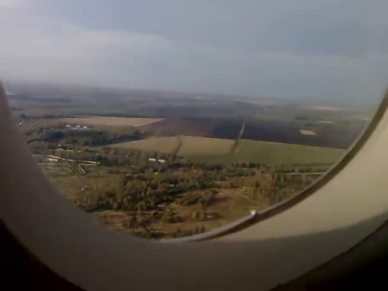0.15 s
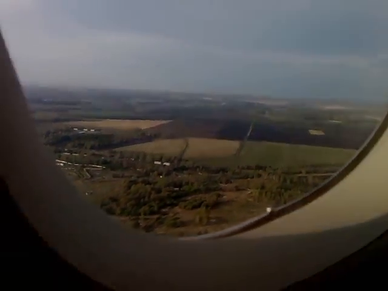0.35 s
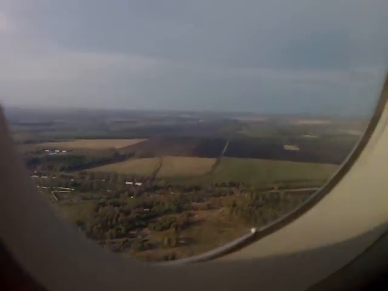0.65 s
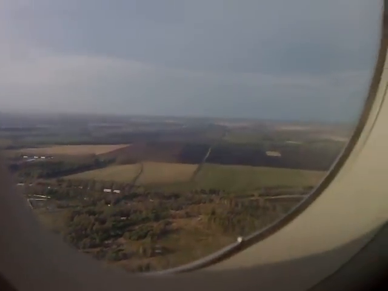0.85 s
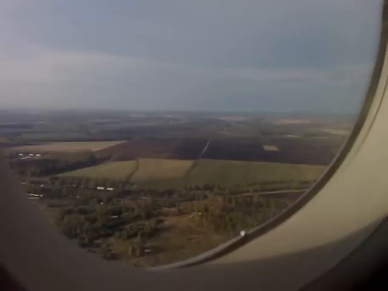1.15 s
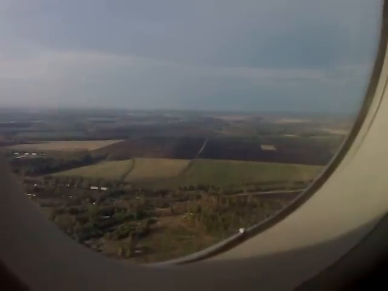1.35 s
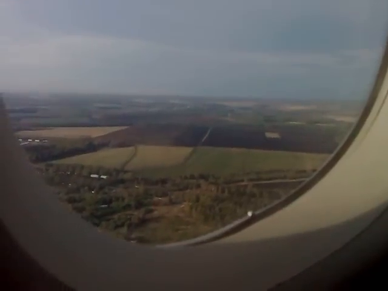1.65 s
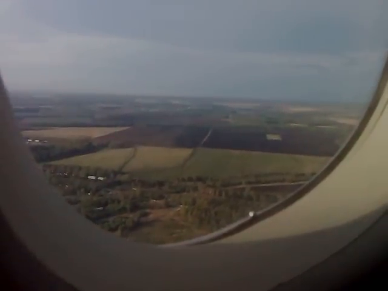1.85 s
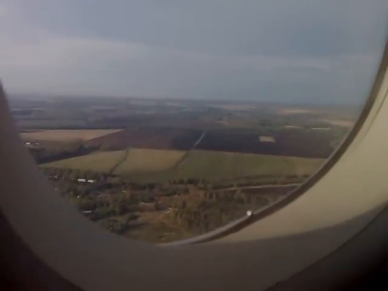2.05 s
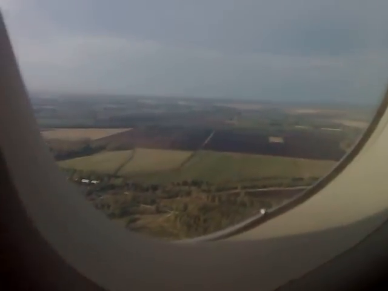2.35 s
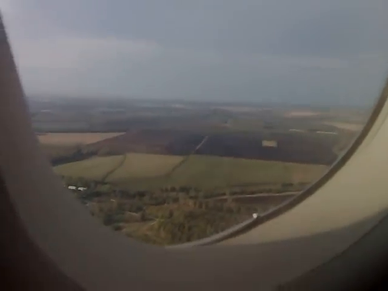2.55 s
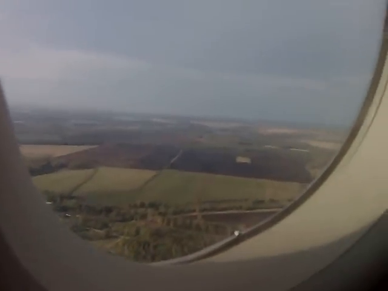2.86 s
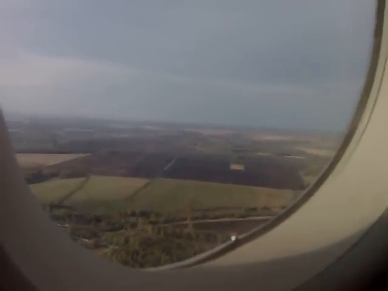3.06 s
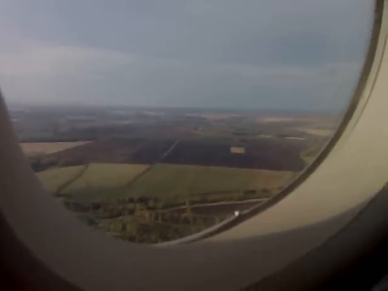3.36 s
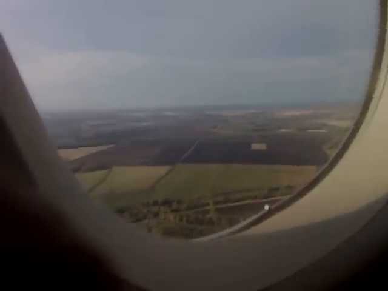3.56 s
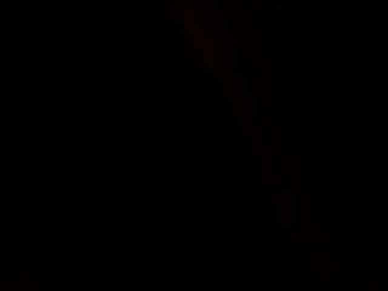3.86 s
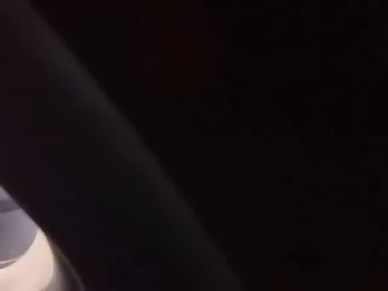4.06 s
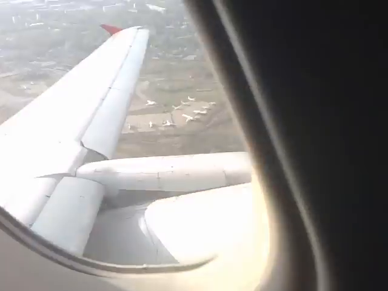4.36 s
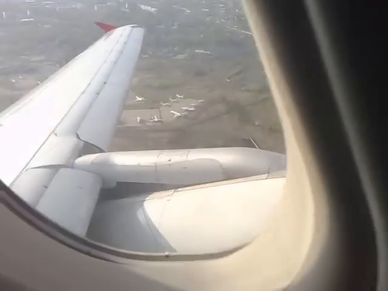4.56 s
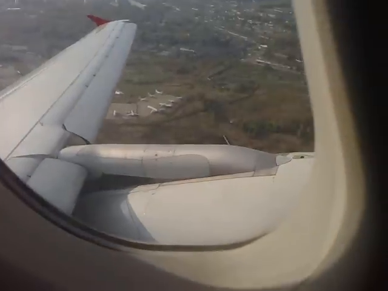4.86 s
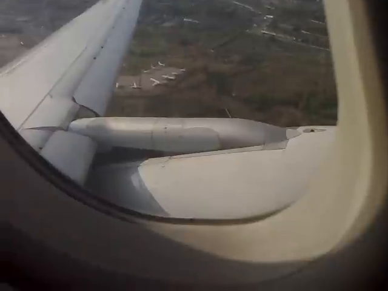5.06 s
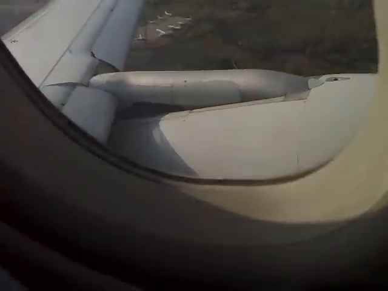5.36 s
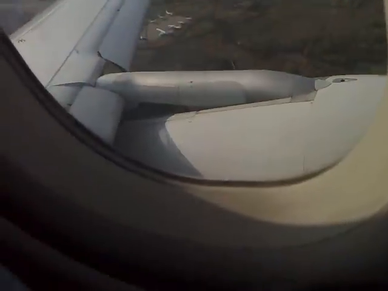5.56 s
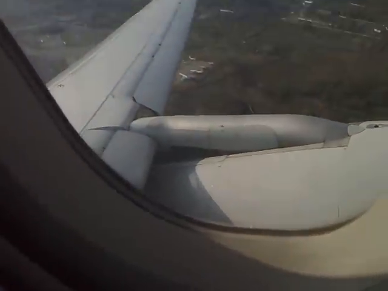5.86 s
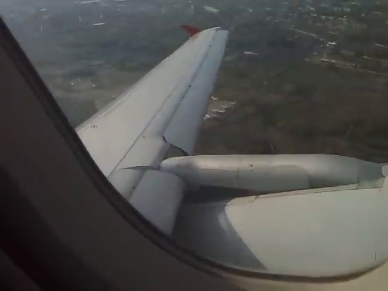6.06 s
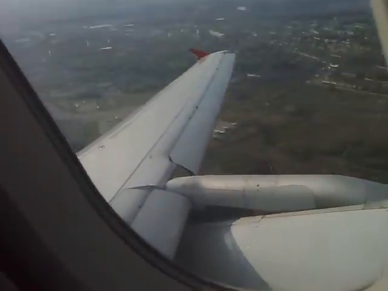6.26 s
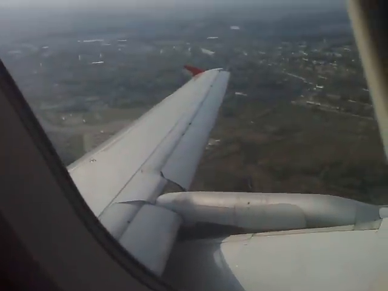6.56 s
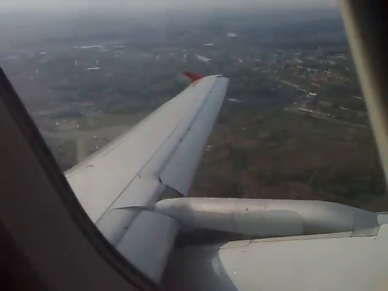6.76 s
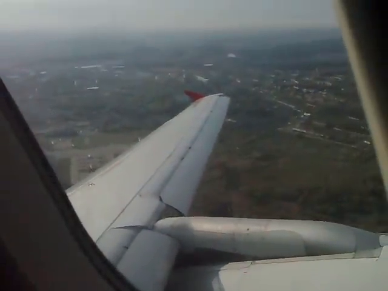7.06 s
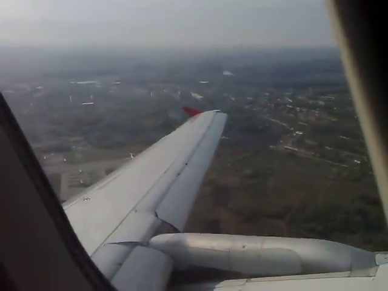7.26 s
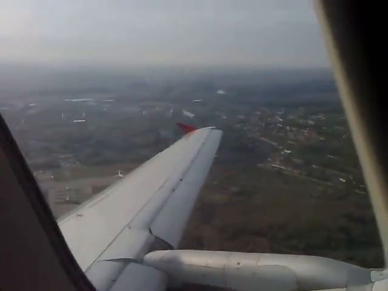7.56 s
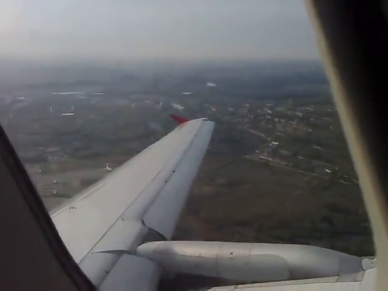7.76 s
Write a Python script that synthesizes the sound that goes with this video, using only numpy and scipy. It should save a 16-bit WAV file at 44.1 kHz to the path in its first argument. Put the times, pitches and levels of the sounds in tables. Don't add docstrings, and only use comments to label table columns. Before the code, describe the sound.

Inside an airliner cabin during climb, a loud steady engine rumble and low hum carry a buzzing, sawing fan whine and soft air hiss.

```python
import sys
import numpy as np
from scipy import signal
from scipy.io import wavfile
from scipy.ndimage import uniform_filter1d

SR = 44100
rng = np.random.default_rng(int(sys.argv[2]) if len(sys.argv) > 2 else 0)


def volts_from_decibels(level):
    exponent = np.asarray(level, float) / 20
    return 10 ** exponent


def bounce(signal):
    frames = np.transpose(np.atleast_2d(signal))
    limited = np.clip(frames, -1, 1)
    pcm = np.round(limited * 32767).astype(np.int16)
    wavfile.write(sys.argv[1], SR, pcm)


N = 349272


def evened(x):
    return x / np.sqrt(np.mean(x ** 2) + 1e-20)


def wander(t, top_hz, count):
    hz = np.geomspace(top_hz / 12, top_hz, num=12)[:, None]
    phase = rng.random((count, 12, 1))
    waves = np.sin(2 * np.pi * (hz * t + phase)) / np.sqrt(hz)
    return evened(waves.sum(axis=1))


# time in seconds, place from 0 (forward window)
# to 1 (wing window), change of the treble in dB as hand and wall shade it.
CAMERA = [(0, 0, 0), (1.4, 0, -.5), (2.1, 0, 1), (2.55, 0, -.5), (2.75, 0, -4.5), (3.3, 0, -5),
          (3.9, .1, -4.5), (4.3, .45, -2.5), (4.7, 1, 0), (5.6, 1, -.5), (6.5, 1, 1), (7.92, 1, .5)]


def camera(t):
    s, place, shade_db = np.transpose(CAMERA)
    return np.clip(np.interp(t, s, place), 0, 1), np.interp(t, s, shade_db)


def heard_db(table, hz, t):
    table_hz, forward_db, wing_db = np.transpose(table)
    place, shade_db = camera(t)
    pitch, table_pitch = np.log(hz + 1), np.log(table_hz)
    forward = np.interp(pitch, table_pitch, forward_db)[:, None]
    wing = np.interp(pitch, table_pitch, wing_db)[:, None]
    treble = np.clip(np.log((hz[:, None] + 1) / 3800) / .45, 0, 1)
    return forward + (wing - forward) * place + treble * shade_db


def airflow(table, size, patchy_db, swell_db):
    hop = size // 4
    frames, hz = N // hop + 5, np.fft.rfftfreq(size, 1 / SR)
    t = np.arange(frames) * hop / SR
    real, imaginary, patches = rng.standard_normal((frames, len(hz), 3)).T
    patches = uniform_filter1d(patches, size=8, axis=0)
    patches = evened(uniform_filter1d(patches, size=6, axis=1))
    swell = wander(t, 3.0, count=1)
    level_db = heard_db(table, hz, t) + patchy_db * patches + swell_db * swell
    spectra = (real + 1j * imaginary) * volts_from_decibels(level_db)
    noise = signal.istft(spectra, nperseg=size, noverlap=size - hop)[1][:N]
    return noise * np.sqrt(SR / size * 3 / 2)


# frequency in Hz, level in dB per Hz at the forward window,
# level in dB per Hz at the wing.
RUMBLE = [(15, -73.5, -75.5), (30, -61, -60.5), (54, -38.5, -41.5), (83, -42.5, -41.5), (125, -44, -42),
          (152, -44, -45.5), (216, -46.5, -45.5), (259, -43, -44.5), (286, -44, -47.5), (321, -51, -48.5),
          (428, -57.5, -51), (452, -59, -57), (605.5, -67, -60.5), (2010, -150, -150)]


def jet_rumble():
    return airflow(RUMBLE, size=8192, patchy_db=.4, swell_db=.2)


# frequency in Hz, level in dB per Hz at the forward
# window, level in dB per Hz at the wing.
HISS = [(300, -80, -80), (700, -71, -66), (880, -73, -69), (1150, -72, -69), (1700, -78, -77),
        (2350, -77, -81), (3000, -84, -86), (4200, -93, -95), (4900, -96, -97), (6300, -104, -112),
        (8500, -113, -118), (10000, -123, -126), (11500, -137, -137), (16000, -160, -160)]


def boundary_layer_hiss():
    return airflow(HISS, size=1024, patchy_db=.7, swell_db=.2)


# start in seconds, then the level in dB
TICKS = [
    (3.4652, -46, -41, -56, -70),
    (3.5458, -44, -62, -72, -90),
    (3.6232, -30, -40, -52, -64),
    (4.55, -60, -60, -70, -90),
    (6.2923, -36, -48, -42, -85),
    (6.7305, -52, -66, -72, -90),
]


def finger_ticks():
    shell_hz, t60_s, rise_s = (4700, 6200, 8100, 13800), .0035, .0004
    out, t = np.zeros(N), np.arange(600) / SR
    rings = np.sin(2 * np.pi * np.outer(shell_hz, t))
    rings = rings * volts_from_decibels(-60 * t / t60_s) * np.minimum(t / rise_s, 1)
    signs = (-1.) ** np.arange(len(rings))
    for s, *modes_db in TICKS:
        at = round(s * SR)
        out[at:at + len(t)] += volts_from_decibels(np.array(modes_db)) * signs @ rings
    return out


BASE_RPM = 4500
ORDERS = np.arange(1, 121)

# frequency in Hz, level in dB at the forward window,
# level in dB at the wing.
COMB = [(300, -55, -52), (2000, -64, -66), (3000, -70, -72), (4000, -79, -81), (5000, -82, -86),
        (6000, -89, -94), (8300, -100, -105), (10000, -116, -118)]
STRONG_ORDERS = (1, 3, 6, 12, 13, 14, 15, 16, 17, 20, 21, 22, 23, 25, 26, 29, 32, 34, 37, 39, 40, 42, 43,
                 45, 48, 55, 57, 65)
# level in dB at the forward window, level in dB at the wing.
ORDERS_DB = [(-30, -35), (-47.5, -36.5), (-47.5, -49), (-57, -54), (-59.5, -50.5), (-49.5, -55.5),
             (-46.5, -53), (-45.5, -45), (-45.5, -52), (-50, -60.5), (-54.5, -68.5), (-49.5, -53.5),
             (-56, -65), (-63.5, -56), (-53.5, -71.5), (-61, -73), (-54, -62), (-61.5, -63), (-62.5, -68),
             (-62, -74.5), (-77.5, -67), (-65.5, -75.5), (-66.5, -70.5), (-65.5, -69.5), (-67.5, -79.5),
             (-73.5, -83), (-71, -75), (-73.5, -75)]
LEAD_ORDERS = (2, 4, 10, 11, 18, 19, 27, 36, 24, 38)
# level in dB at the forward window, level in dB at the wing.
LEAD_DB = [(-27.5, -25), (-25.5, -30.5), (-46.5, -45), (-51, -46), (-47.5, -43.5), (-46, -45), (-48, -60),
           (-54.5, -60.5), (-51.5, -54), (-54, -70)]
NODE_ORDERS = (2, 38, 4, 4, 10, 10, 11, 11, 11, 16, 17, 17, 18, 18, 18, 18, 18, 18, 18, 19, 19, 19, 19, 19,
               24, 27, 36, 36, 36, 36)
# time in seconds, change in dB (node below 0,
# crest above), half width in seconds.
NODES = [(5.2, -3.5, .5), (3.5, -6, .8), (5.5, -15, .45), (7.7, -4, 0.67), (1, -7.5, .6), (3.45, -14, .5),
         (3.3, -3, .2), (4.47, -19, 0.23), (7.3, -10.5, 1.0), (3.85, -16, .22), (4.55, -6, .15),
         (6.0, 5, .3), (0.27, -14, .3), (2.35, -15.5, .3), (3.2, -7.5, 0.46), (4.45, -14, .25),
         (5.13, -19, 0.12), (5.85, -6.5, 0.19), (6.65, -8, .15), (1.02, -15.5, .3), (3.2, -18, 0.074),
         (3.5, -18, 0.11), (5.5, -4.5, 0.54), (6.2, -17.5, 0.093), (1.1, -12, 0.56), (3.0, -8.5, 0.13),
         (2.7, -9, .15), (3.15, -9, .1), (3.9, 8.5, 0.1), (5.5, -8, 0.55)]


def order_levels_db(t):
    place = camera(t)[0] ** 1.6
    blades = rng.standard_normal((len(ORDERS), 2))
    level_db = heard_db(COMB, ORDERS * BASE_RPM / 60, t)
    level_db += 3.0 * (blades[:, :1] * (1 - place) + blades[:, 1:] * place)
    for order, (forward, wing) in zip(STRONG_ORDERS + LEAD_ORDERS, ORDERS_DB + LEAD_DB):
        level_db[order - 1] = forward + (wing - forward) * place
    depth_db = np.clip(1.3 + .06 * ORDERS, 0, 3.3)[:, None]
    depth_db[np.array(LEAD_ORDERS) - 1] = 1.0
    level_db += depth_db * wander(t, 3.5, count=len(ORDERS))
    level_db -= np.log(10) / 20 * depth_db ** 2
    for order, (s, change_db, width) in zip(NODE_ORDERS, NODES):
        level_db[order - 1] += change_db * np.exp(-((t - s) / width) ** 2)
    return level_db


def fan():
    over_rpm, creep_rpm_per_s = 23.0, 2.0
    t, slow = np.arange(N) / SR, np.arange(0, N / SR + .1, .02)
    turns = np.cumsum(BASE_RPM + over_rpm + creep_rpm_per_s * t) / 60 / SR
    level_db = order_levels_db(slow)
    drift = .0045 * ORDERS[:, None] * wander(slow, 3.0, count=len(ORDERS))
    slip = rng.random((len(ORDERS), 1)) + drift
    heights = np.sqrt(2) * volts_from_decibels(level_db) * np.exp(2j * np.pi * slip)
    out, shaft = np.zeros(N), np.exp(2j * np.pi * turns)
    spin = np.ones(N, complex)
    for height in heights:
        spin = spin * shaft
        out += (np.interp(t, slow, height) * spin).real
    return out


def scene():
    return (jet_rumble() + boundary_layer_hiss() + finger_ticks() + fan())[None]


def low_pass(x):
    return signal.sosfilt(signal.butter(12, 15720, fs=SR, output="sos"), x)


def record(dry):
    power = uniform_filter1d(uniform_filter1d(dry ** 2, 3000, axis=1), 3000, axis=1)
    power_db = 10 * np.log10(abs(power) + 1e-9)
    held = dry / volts_from_decibels(.3 * (power_db + 17.7))
    held = held * np.minimum(np.arange(N) / 40, 1)
    self_noise_db = -93
    held = held + volts_from_decibels(self_noise_db) * rng.standard_normal(N)
    return low_pass(held)


dry = scene()
out = record(dry)
bounce(out)
```